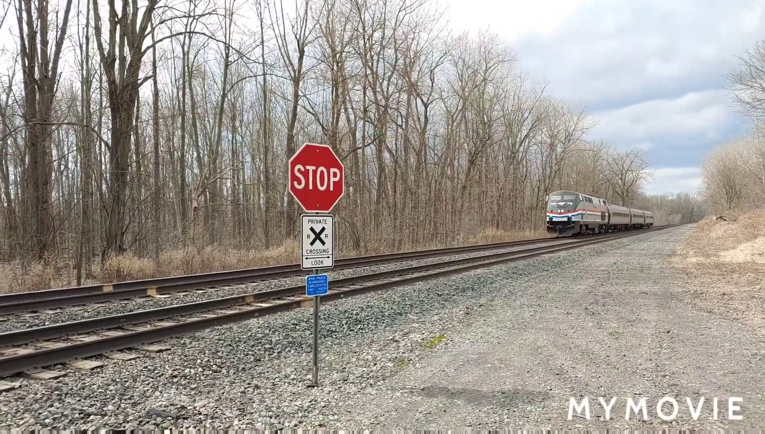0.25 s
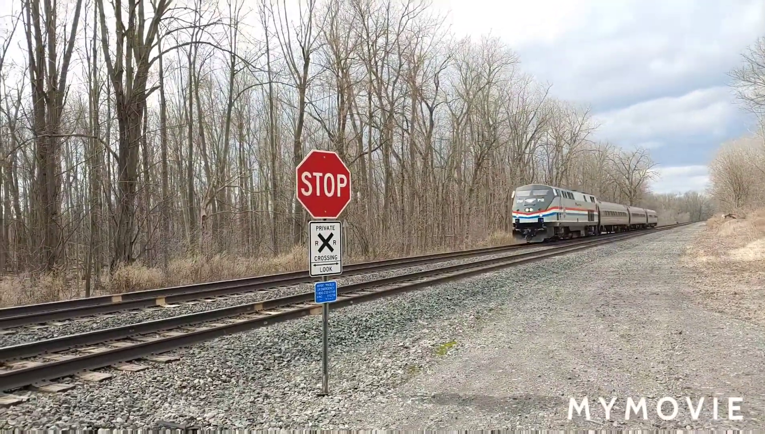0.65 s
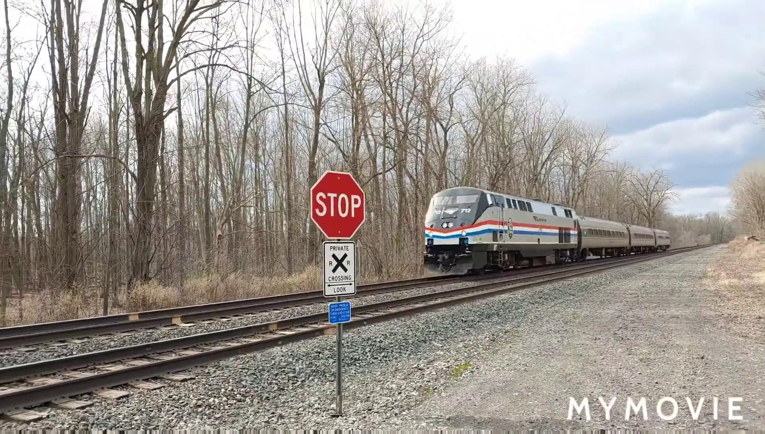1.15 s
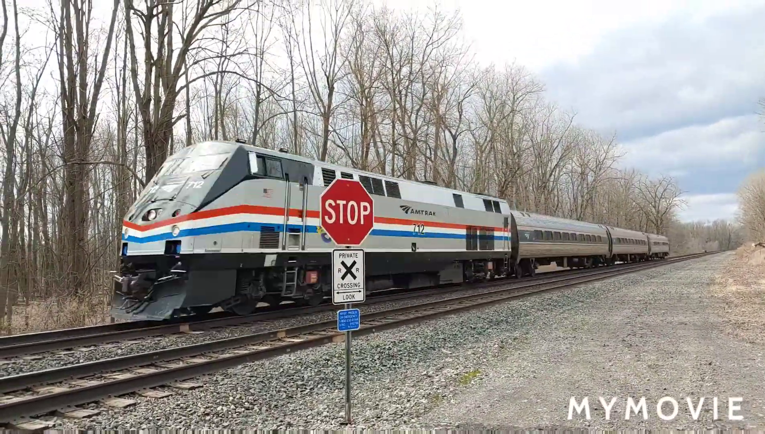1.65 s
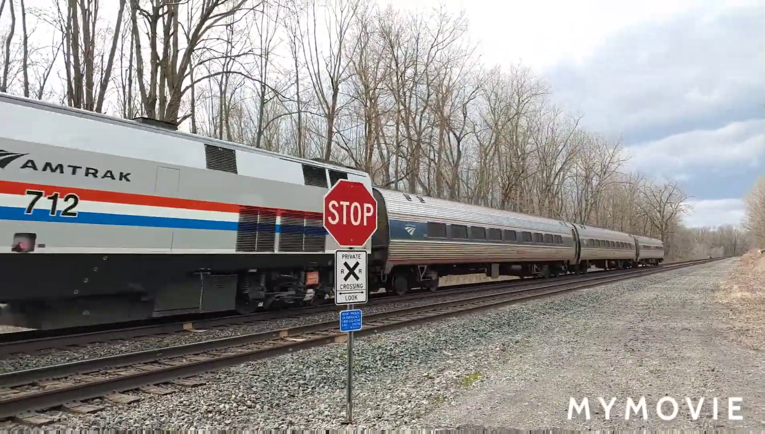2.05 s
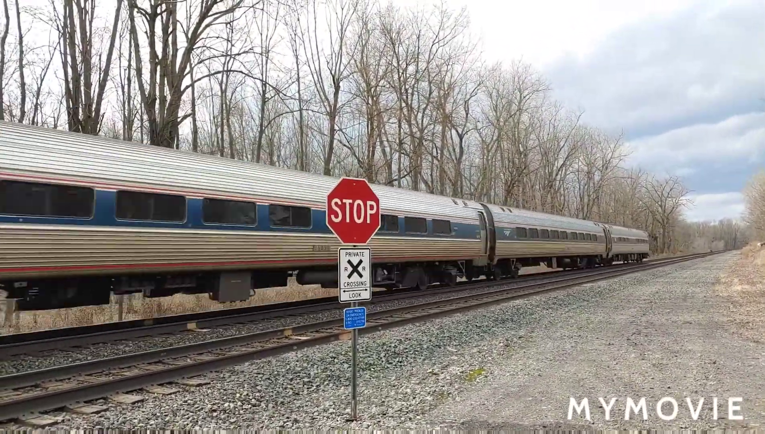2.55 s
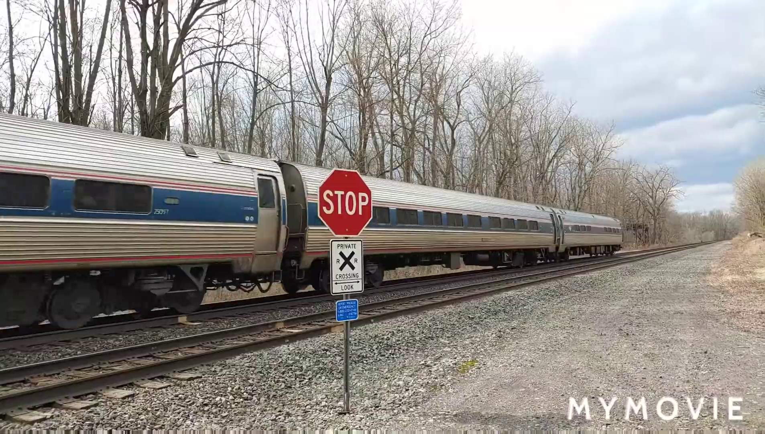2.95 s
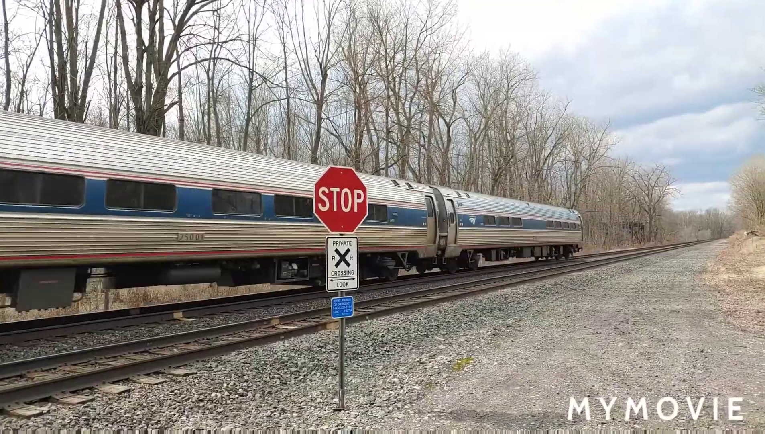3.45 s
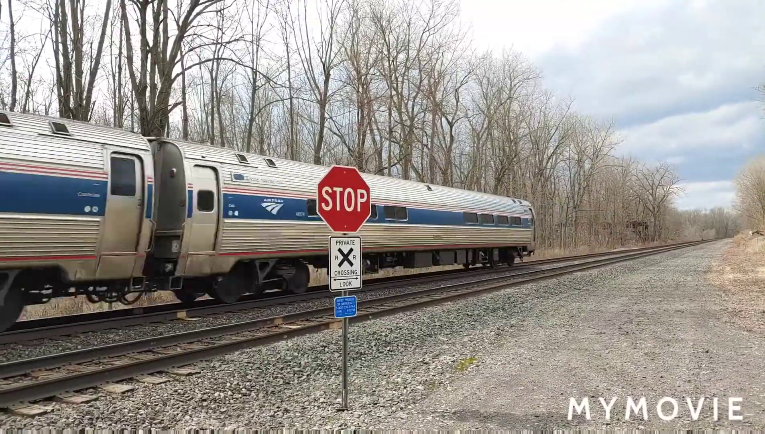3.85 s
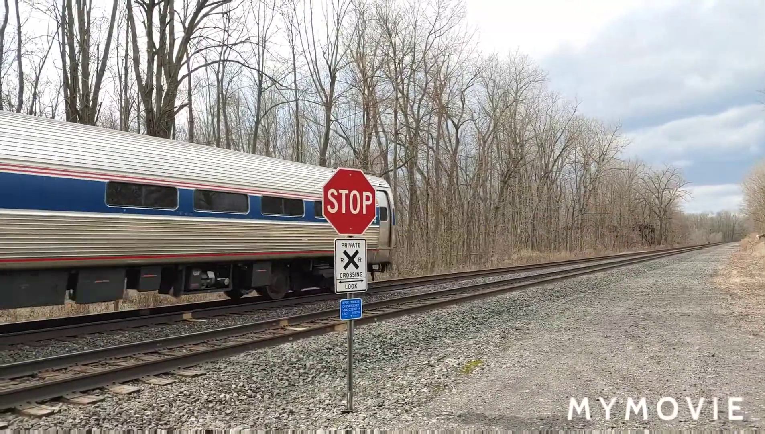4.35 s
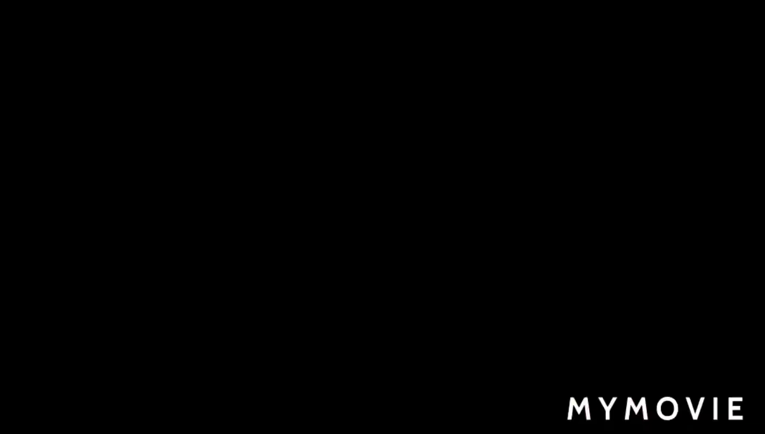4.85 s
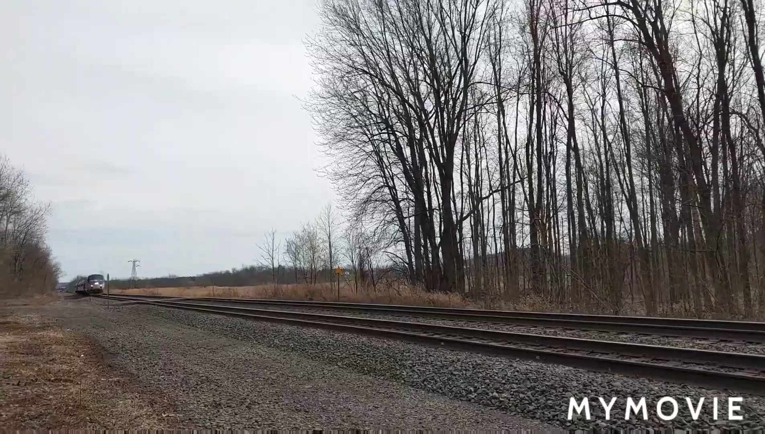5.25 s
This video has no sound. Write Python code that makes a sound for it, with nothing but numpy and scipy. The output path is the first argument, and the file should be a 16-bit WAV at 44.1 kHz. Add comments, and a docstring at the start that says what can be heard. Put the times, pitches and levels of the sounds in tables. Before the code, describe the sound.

Open air beside a railway, small microphone ten to twelve metres from the rails. The sound eases in over 0.4 s: a diesel locomotive is already approaching, its deep, uneven exhaust throbbing about seven or eight times a second over ground rumble. A flat wheel knocks roughly eleven times a second, louder and brighter until about 2.2 s. Rougher wheel noise surges briefly near 1.4 s, and thin high steel hiss grows until 2 s. Around 2.1-2.5 s the engine passes, loud and limited, its drone and blower hum dropping in pitch, with short squeaks. From 2.5 to 4.9 s coaches rush by in waves of boom, roar and sizzle, wheels ringing, with bumps near 3.1 and 4.5 s and squeaks near 3.2 and 4.7 s. At 4.97 s everything breaks off; a faint far locomotive drone fades in by 5.2 s, with soft noise and tiny dry crackles until the end.

```python
"""Outdoors beside a railway, a small microphone stands ten to twelve metres from a fast diesel train.
The exhaust, a sum of engine orders, throbs and drops in pitch; a flat wheel knocks as it nears.
Coaches follow as filtered noise that booms, roars and hisses, with ringing wheels, bumps and squeaks.
Near 5 s the train breaks off; a far-off locomotive fades in, droning from its own orders, amid faint
noise and small dry crackles."""
import sys
import numpy as np
from scipy import signal
from scipy.fft import rfft, irfft
from scipy.io import wavfile
from scipy.ndimage import uniform_filter1d, minimum_filter1d

SR = 44100
rng = np.random.default_rng(int(sys.argv[2]) if len(sys.argv) > 2 else 0)


def transcribe(signal):
    """Save signal, clipped to [-1, 1], as a 16-bit WAV file at the path in sys.argv[1]."""
    frames = np.atleast_2d(signal).T
    limited = np.clip(frames, -1, 1)
    pcm = np.round(limited * 32767).astype(np.int16)
    wavfile.write(sys.argv[1], SR, pcm)


N = 242946

TIME = np.arange(N) / SR  # s
FRAME_S = np.arange(N // 256 + 5) * 256 / SR  # times of the noise frames, s
BIN_HZ = np.fft.rfftfreq(1024, 1 / SR)  # frequencies of the noise frames, Hz

SPEED = 33.563  # of the near train, m/s
SOUND_SPEED = 343  # m/s
TRACK_M = 10  # from the wheels to the microphone, m


def gain_of(db):
    """Amplitude factor of a level in dB."""
    return 10 ** (np.asarray(db) / 20)


def evened(x):
    """Scales a signal to unit RMS level."""
    return x / np.sqrt(np.mean(abs(x) ** 2) + 1e-20)


def read(points, hz):
    """A spectrum in dB, joined by straight lines on a log-frequency axis."""
    f, db = np.transpose(points)
    return np.interp(np.log(hz + 1), np.log(f + 1), db)


def add(mix, s, sound):
    """Lays a short sound into the mix from s seconds on."""
    part = mix[max(round(s * SR), 0):][:len(sound)]
    part += sound[:len(part)]


def colour(x, points):
    """Filters a sound by a spectrum."""
    gain = gain_of(read(points, np.fft.rfftfreq(len(x), 1 / SR)))
    return irfft(rfft(x) * gain, len(x))


def coloured_noise(points):
    """Steady noise of unit level, as long as the scene, shaped by a spectrum."""
    return evened(colour(rng.standard_normal(N), points))


def ringing(hz, width, size):
    """Noise in a resonance that may move, at unit level."""
    r = np.exp(-np.pi * abs(width) * 1.5 / SR)
    slow = rng.standard_normal(size) + 1j * rng.standard_normal(size)
    for _ in range(2):
        slow = signal.lfilter([1 - r], [1, -r], slow)
    phase = 2 * np.pi * np.cumsum(hz * np.ones(size)) / SR
    return evened((slow * np.exp(1j * phase)).real)


def wavering(hz, wobble):
    """A steady tone of unit level whose pitch wanders a little (wobble: RMS fraction of the pitch)."""
    drift = coloured_noise([(0, 0), (8, 0), (40, -40), (200, -120)])
    return np.sqrt(2) * np.sin(2 * np.pi * np.cumsum(hz * (1 + wobble * drift)) / SR)


def judder(depth_db, size):
    """Gain of quick random swings of level, smoothed over about size samples."""
    smooth = uniform_filter1d(uniform_filter1d(rng.standard_normal(N), size), size // 2)
    return evened(gain_of(depth_db * evened(smooth)))


def spell(start, end, db, rise, fall):
    """Gain that rises from start, holds and dies away after end; a negative rise fades out until start."""
    opening = np.clip((TIME - start) / rise, 0, 1)
    return gain_of(db) * opening * np.exp(-np.maximum(TIME - end, 0) / fall)


def passing(nearest_s, metres):
    """Range, Doppler factor and bearing (0 ahead, 1 gone by) of a point on the train."""
    along = SPEED * (TIME - nearest_s)
    reach = np.hypot(along, metres)
    doppler = 1 - SPEED / SOUND_SPEED * along / reach
    return reach, doppler, (1 + along / reach) / 2


def flyby(db, nearest_s, metres, ahead, behind):
    """Gain of a passing source: it falls with a power of the range, one power ahead and one behind."""
    reach, _, gone = passing(nearest_s, metres)
    return gain_of(db) * (metres / reach) ** (ahead + (behind - ahead) * gone)


# Exhaust of the engine far down the line. Each row: multiple of the engine cycle, relative level in dB.
FAR_EXHAUST = [(6, -18), (7, -15), (9, -15), (12, -1.5), (13, -11), (14, -10), (15, 1), (19, -17),
               (20, -18), (30, -27)]
# Its steady whine. Each row: pitch in Hz, width in Hz, level in dB against the far rolling noise.
FAR_WHINE = [(763.65, 28.1, -9), (2070, 226.3, -12.5)]
# Spectrum of its wheels heard from afar. Each row: frequency in Hz, relative level in dB per Hz.
FAR_ROLL = [(88, -31.5), (150, -5), (215, -10.5), (340, -11.5), (420, -16), (700, -15), (1020, -16.5),
            (1850, -20), (2100, -15.5), (2450, -23.5), (3200, -39), (4160, -54)]
# Spectrum of the faint high noise and the crackles. Each row: frequency in Hz, relative level in dB per Hz.
FAR_FIZZ = [(1760, -63.5), (3000, -26.5), (4500, -12), (5770, -26), (6060, -22), (7450, -17.5), (8150, -5),
            (9220, -5.5), (10000, -9.5), (11400, -8.5), (12400, -11), (13500, -11.5), (15000, -19.5),
            (15600, -28)]
# Crackles near the microphone. Each row: start in seconds, peak level in dB.
CRACKLES = [(5.219, -23), (5.277, -15.5), (5.34, -17.5), (5.3453, -19), (5.3773, -28.5), (5.416, -42),
            (5.4962, -36)]
FAR_CYCLE_HZ = 5.787
FAR_STRONG_S = 5.2805  # a moment when the far engine's firings add up most
FAR_DRONE_DB, FAR_ROLL_DB, FAR_FIZZ_DB = -23.5, -42, -38


def far_train():
    """Far down the line engine orders beat into a drone over rolling noise; noise bursts crackle close by."""
    turns = FAR_CYCLE_HZ * (TIME - FAR_STRONG_S)
    exhaust = evened(sum(gain_of(db) * np.cos(2 * np.pi * k * turns) for k, db in FAR_EXHAUST))
    whine = sum(gain_of(db) * ringing(hz, width, size=N) for hz, width, db in FAR_WHINE)
    whine += gain_of(-6.5) * wavering(382, wobble=0.002585)  # its blower
    out = gain_of(FAR_DRONE_DB) * exhaust
    out += gain_of(FAR_ROLL_DB) * (coloured_noise(FAR_ROLL) + whine)
    out += gain_of(FAR_FIZZ_DB) * coloured_noise(FAR_FIZZ) * judder(depth_db=1.5, size=120)
    t = np.arange(SR // 50) / SR
    for s, db in CRACKLES:
        tick = colour(rng.standard_normal(len(t)) * np.exp(-t / 0.0035), FAR_FIZZ)
        add(out, s, gain_of(db) * tick / abs(tick).max())
    return out


# A rougher stretch of rail under the wheels. The row: start in seconds, end in seconds, lift in dB
# (not fully reached, as the fall begins during the rise), rise in seconds, fall in seconds.
ROUGH_STRETCH = (1.3595, 1.3759, 4.445, 0.05315, 0.1401)


def roughness():
    """Gain by which the rougher stretch of rail lifts the noise of the wheels."""
    start, end, lift_db, rise, fall = ROUGH_STRETCH
    return gain_of(lift_db * spell(start, end, 0, rise, fall))


def patches(frames_order, bins_order):
    """A smooth random field over time and frequency, averaged over that many frames and bins."""
    field = rng.standard_normal((len(BIN_HZ), len(FRAME_S)))
    return evened(uniform_filter1d(uniform_filter1d(field, frames_order, 1), bins_order, 0))


# Rail resonances, heard with the coaches abreast. Each row: frequency in Hz, width in Hz, lift in dB.
RAIL = [(826.52, 103.5, 4), (1482, 41.65, 6)]


def rolling_noise(ahead, beside, patchy_db, turn_s, turn_length):
    """Rough steel on steel: patchy noise through the rail, changing colour as the coaches draw level."""
    level_with = np.clip(.5 + (FRAME_S - turn_s) / turn_length, 0, 1)
    first = evened(gain_of(read(ahead, BIN_HZ)))[:, None]
    second = evened(gain_of(read(beside, BIN_HZ)))[:, None]
    rail_db = sum(db / (1 + (2 * (BIN_HZ - hz) / width) ** 2) for hz, width, db in RAIL)
    size = first * (1 - level_with) + second * level_with
    size = size * gain_of(rail_db[:, None] * level_with)
    # broad short patches are rattles; narrow long ones are steel parts that ring for a while
    rattles = patches(frames_order=6, bins_order=12)
    rings = patches(frames_order=26, bins_order=3)
    size = size * gain_of(patchy_db * rattles + 1.9398 * rings)
    z = rng.standard_normal(size.shape) + 1j * rng.standard_normal(size.shape)
    return evened(signal.istft(z * size, nperseg=1024, noverlap=768)[1][:N])


# Groups of bogies ten metres off, the locomotive's first. Each row: time nearest the microphone in seconds,
# then levels at that distance in dB of boom, roar, hiss, sizzle and wheel ring.
BOGIES = [(2.099, -23.5, -24, -26, -15.5, -42), (2.85, -26, -21, -24.5, -22.5, -30.5),
          (3.55, -31.5, -22, -26, -22, -22), (4.2, -22.5, -17.5, -24, -19.5, -28),
          (4.8, -26, -21.5, -26.5, -20, -37)]
# Loss beyond plain spreading, negative where the rails carry the sound along.
# The row: boom, roar, hiss and sizzle, all in dB per metre.
LOSS_DB_PER_M = (-0.05317, -0.01666, 0.02091, 0.10584)


def rolling_levels():
    """Gains of boom, roar, hiss and sizzle: the bogie groups' powers, thinned by range and loss, add up."""
    power = np.zeros((4, N))
    for s, *band_db, _ in BOGIES:
        reach = passing(s, TRACK_M)[0]
        for band, (db, loss) in enumerate(zip(band_db, LOSS_DB_PER_M)):
            power[band] += (gain_of(db - loss * (reach - TRACK_M)) * TRACK_M / reach) ** 2
    return np.sqrt(power)


# Spectra of the rolling train, from up the line (AHEAD) and with the coaches abreast (BESIDE).
# Each row: frequency in Hz, relative level in dB per Hz.
BOOM_AHEAD, BOOM_BESIDE = [(70, -33.5), (130, 2.5), (190, 1.5), (260, 2), (330, 1), (420, -7.5),
                           (520, -1.5), (750, -40)], [(70, -38.5), (130, -3), (190, 3), (250, -4.5), (320, 4),
                                         (420, -1.5), (520, -2), (750, -44)]
ROAR_AHEAD, ROAR_BESIDE = [(260, -41.5), (450, -28), (573, -3), (718, -2.5), (1370, -11.5), (1670, -8),
                           (1990, -14), (2260, -10), (2900, -15.5), (3770, -16.5), (6380, -120)], [(260, -14), (450, -7.5), (680, -1), (801, -1.5), (915, -5.5),
                                               (1070, -6.5), (1460, -3.5), (1750, -5.5), (2040, -4.5),
                                               (2410, -13), (2900, -21), (3770, -74.5), (6380, -120)]
HISS_AHEAD, HISS_BESIDE = [(1590, -69.5), (2700, -2.5), (3410, -3), (4580, 6.5), (5590, -4.5),
                           (6200, -20.5), (8060, -44), (13600, -120)], [(1590, -67.5), (2700, -6), (3170, -5.5), (3940, 4),
                                               (4660, 3), (5100, 2.5), (5590, -26), (6200, -10.5),
                                               (8060, -39), (13600, -120)]
SIZZLE_AHEAD, SIZZLE_BESIDE = [(3530, -24.5), (6000, -20), (6550, -16.5), (7710, -5), (8090, -2),
                               (9310, -13), (11700, -21.5), (13600, -38.5), (15600, -76)], [(3530, -25.5), (6000, -17), (6710, -10), (7500, -10.5),
                                                     (8130, -1.5), (8560, -2.5), (9530, -6.5),
                                                     (10800, -15.5), (12300, -19), (15600, -46.5)]
# Narrow steel hiss thrown ahead of the locomotive.
# The row: start in seconds, end in seconds, level in dB, rise in seconds, fall in seconds.
SINGING = (1.326, 2, -24.5, 0.2517, 0.005)


def rails():
    """Boom, roar, hiss and sizzle of steel rolling on steel; rough rail lifts all but the boom."""
    boom, roar, hiss, sizzle = rolling_levels()
    rough = roughness()
    low = boom * rolling_noise(BOOM_AHEAD, BOOM_BESIDE, patchy_db=2.5, turn_s=2.9, turn_length=1.6)
    low += rough * roar * rolling_noise(ROAR_AHEAD, ROAR_BESIDE, patchy_db=1.0, turn_s=2.3617, turn_length=0.47)
    high = hiss * rolling_noise(HISS_AHEAD, HISS_BESIDE, patchy_db=1.5, turn_s=3.329, turn_length=0.929)
    high += sizzle * rolling_noise(SIZZLE_AHEAD, SIZZLE_BESIDE, patchy_db=1.5, turn_s=2.7424, turn_length=1.0)
    singing = spell(*SINGING) * ringing(7960, 239.6, size=N)
    return low * judder(depth_db=0.7776, size=500) + rough * high + singing


# Ringing of the rolling wheels. Each row: frequency in Hz, width in Hz, relative level in dB.
WHEEL_MODES = [(811.28, 28.23, -4.5), (1516.5, 54.15, 1.5), (2042.7, 114.56, 2), (4277.5, 20.33, -11),
               (8726.3, 457.4, 5)]


def bogies():
    """Each group of wheels rings, swells and glides down as it goes by."""
    out = np.zeros(N)
    for s, *_, db in BOGIES:
        reach, doppler, _ = passing(s, TRACK_M)
        ring = sum(gain_of(mode_db) * ringing(hz * doppler, width, size=N)
                   for hz, width, mode_db in WHEEL_MODES)
        out += gain_of(db) * evened(ring) * (TRACK_M / reach) ** 1.4733
    return out


# Brief flange squeaks. Each row: middle in seconds, pitch in Hz, level in dB, length in seconds.
SQUEAKS = [(2.14, 2920, -21.5, 0.068), (2.235, 3412, -21, .1), (3.175, 12260, -30.5, .04),
           (4.74, 7084, -18.5, .05), (4.95, 8795, -20, .05), (4.966, 2718, -29, 0.05)]


def flanges():
    """A flange brushes the rail and squeaks for a moment, as narrow noise under a smooth swell."""
    out = np.zeros(N)
    for s, hz, db, length in SQUEAKS:
        size = int(length * SR)
        squeak = np.hanning(size) * ringing(hz, hz * 0.0634, size=size)
        add(out, s - length / 2, gain_of(db) * squeak)
    return out


# What the struck wheel rings with. Each row: frequency in Hz, width in Hz, relative level in dB.
KNOCK_MODES = [(614.32, 95.8, 0.5), (736.29, 91.3, 3), (986.15, 17.53, -3), (1648.4, 24.47, -3),
               (2265.7, 117.8, -5), (2792.7, 327.3, -6.5), (3521.8, 42.36, -13.5)]


def knock(treble_db, decay_s=0.02682, rise_s=0.0004333, crack=0.5524):
    """A blow on the rail sets a wheel ringing and rattling."""
    t = np.arange(SR // 10) / SR
    treble = gain_of(treble_db)
    blow = (1 - np.exp(-t / rise_s)) * np.exp(-t / decay_s)
    ring = sum(gain_of(mode_db) * (treble if hz > 1200 else 1) * ringing(hz, width, size=len(t))
               for hz, width, mode_db in KNOCK_MODES)
    clatter_spectrum = [(100, -5.5), (350, 12), (2000, 12.5), (5000, -19.5), (14000, -46)]  # Hz, dB per Hz
    clatter = evened(colour(rng.standard_normal(len(t)), clatter_spectrum))
    return evened(blow * (evened(ring) + crack * treble * clatter))


# Single bumps of the coaches. Each row: start in seconds, level in dB.
BUMPS = [(3.128, -27), (4.475, -35), (4.932, -32.5)]


def bumps():
    """Now and then a coach wheel strikes the rail close by."""
    out = np.zeros(N)
    for s, db in BUMPS:
        add(out, s, gain_of(db) * knock(treble_db=-1.5))
    return out


FLAT_FIRST_S, WHEEL_TURN_S, FLAT_NEAREST_S = .159, .09355, 2.25  # one knock a turn until it draws level


def flat_wheel(db=-22, falloff=0.81395, dull_db_per_m=0.0566, scatter_db=1.67):
    """A flat spot knocks once a turn, louder and brighter as it nears."""
    out = np.zeros(N)
    for s in np.arange(FLAT_FIRST_S, FLAT_NEAREST_S, WHEEL_TURN_S):
        reach = np.hypot(SPEED * (s - FLAT_NEAREST_S), TRACK_M)
        strength = gain_of(db + scatter_db * rng.standard_normal()) * (TRACK_M / reach) ** falloff
        add(out, s, strength * knock(-dull_db_per_m * (reach - TRACK_M)))
    return out * roughness()


def blower(db=-27.0, hz=354, beam=2.829):
    """The cooling blower hums slantwise fore and aft, swelling just before and just after it draws level."""
    reach, doppler, gone = passing(2.31, TRACK_M)
    slant = 2 * abs(2 * gone - 1) * TRACK_M / reach  # greatest at 45 degrees
    return gain_of(db) * slant ** beam * wavering(hz * doppler, wobble=0.006798)


# Exhaust orders from the trackside. Each row: multiple of the engine cycle, relative level in dB heard
# from ahead, relative level in dB heard from behind.
EXHAUST = [(6, -13, -23), (9, -15, -19), (10, -10, -12), (11, -10.5, -11.5), (12, 0, 0), (13, -8.5, -15),
           (14, -14.5, -22), (15, -4, -10.5), (16, -15.5, -21), (17, -24, -28), (20, -20, -23),
           (23, -21, -30), (25, -23, -30), (26, -21, -29), (28, -27, -27)]
# Rumble of the ground. Each row: frequency in Hz, relative level in dB per Hz.
RUMBLE = [(15, -23), (28, -12), (42, -3), (68, 0), (100, -1), (130, -3), (200, -12), (400, -60)]
# Rush of the engine's machinery, thrown ahead. Each row: frequency in Hz, relative level in dB per Hz.
MACHINERY = [(180, -25.5), (280, -3), (360, 1.5), (450, -5), (560, 2), (720, -4), (880, -3), (1060, 0),
             (1400, -13.5), (2400, -15.5), (4500, -40.5)]
# Very faint turbocharger whistle, gone before the train is near. The row: time in seconds by which it has
# faded out, end in seconds, level in dB before the fade, rise in seconds (negative: a fade-out), fall in seconds.
TURBO = (0.5, 2.2493, -57.5, -5.9615, 1)
PASS_S, DISTANCE = 2.4116, 12.233  # time in s when the exhaust is nearest, and its distance then in m
CYCLE_HZ = 7.4673  # one cycle of the four-stroke engine: twelve firings
STRONG_AHEAD, STRONG_BEHIND = .63, .463  # place in the cycle where the firings add up most


def locomotive(uneven_beside_db=-5):
    """Unequal firings throb once a cycle and fall in pitch on passing, over ground rumble and machinery."""
    reach, doppler, gone = passing(PASS_S, DISTANCE)
    turns = CYCLE_HZ * (TIME - reach / SOUND_SPEED)  # the travel time of the sound bends the pitch
    uneven = gain_of(uneven_beside_db * (DISTANCE / reach) ** 2)  # abreast, the plain firing tone stands out
    exhaust = np.zeros(N)
    for order, ahead_db, behind_db in EXHAUST:
        # the two orders just under the firing tone ring in the muffler and lag,
        # which breaks each throb into several beats
        lag = 2 * np.pi / 5 * (9 < order < 12) + .12 * rng.standard_normal()
        ahead = gain_of(ahead_db) * np.cos(2 * np.pi * order * (turns - STRONG_AHEAD) - lag)
        behind = gain_of(behind_db) * np.cos(2 * np.pi * order * (turns - STRONG_BEHIND) - lag)
        exhaust += ((1 - gone) * ahead + gone * behind) * (uneven if order % 6 else 1)
    exhaust = evened(exhaust) * judder(depth_db=0.5491, size=400)
    exhaust *= flyby(db=-7.0, nearest_s=2.4948, metres=DISTANCE, ahead=0.4047, behind=0.6121)
    rumble = coloured_noise(RUMBLE)
    rumble *= flyby(db=-18.5, nearest_s=2.843, metres=DISTANCE, ahead=0.2283, behind=0.9006)
    machinery = coloured_noise(MACHINERY)
    machinery *= flyby(db=-29, nearest_s=2.3032, metres=DISTANCE, ahead=0.351, behind=1.78)
    turbo = spell(*TURBO) * ringing(8820 * doppler, 90.8, size=N)
    return exhaust + rumble + machinery + turbo


OPENING_DB, OPENING_S = -3.5, 0.4237  # the sound eases in at the start
BREAK_S, RETURN_S, FAR_FADE_S = 4.966, 4.995, 0.21662  # near train breaks off; far one starts, and its fade


def scene():
    """The near train breaks off and the far one fades in."""
    near = locomotive() + blower() + rails() + bogies() + flat_wheel() + bumps() + flanges()
    broken_off = gain_of(np.interp(TIME, [BREAK_S, BREAK_S + .014, BREAK_S + .04], [0, -40, -80]))
    eased_in = gain_of(OPENING_DB * np.maximum(1 - TIME / OPENING_S, 0))
    faded_in = np.clip((TIME - RETURN_S) / FAR_FADE_S, 0, 1)
    return (near * eased_in * broken_off + far_train() * faded_in)[None]


def record(dry, drive_db=-1.0, recover_db_per_s=110, ceiling_db=-3.4, edge_hz=15700):
    """At the microphone a quick limiter ducks everything under peaks above a ceiling; then the band limit."""
    driven = gain_of(drive_db) * dry
    peak_db = 20 * np.log10(abs(driven[0]) + 1e-9)
    fall = TIME * recover_db_per_s
    held_db = np.maximum.accumulate(peak_db + fall) - fall  # peaks held, sinking at the recovery rate
    over_db = np.maximum(held_db - ceiling_db, 0)
    over_db = uniform_filter1d(-minimum_filter1d(-over_db, size=60), size=90)  # widened, then smoothed
    lowpass = signal.firwin(511, edge_hz, window=("kaiser", 9), fs=SR)[None]
    return signal.oaconvolve(driven / gain_of(over_db), lowpass, "same")


dry = scene()
out = record(dry)
transcribe(out)
```